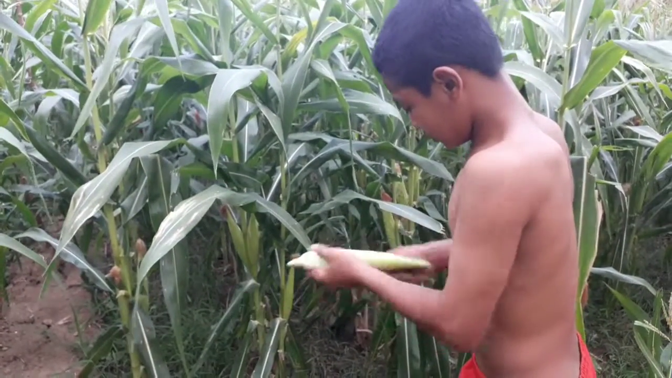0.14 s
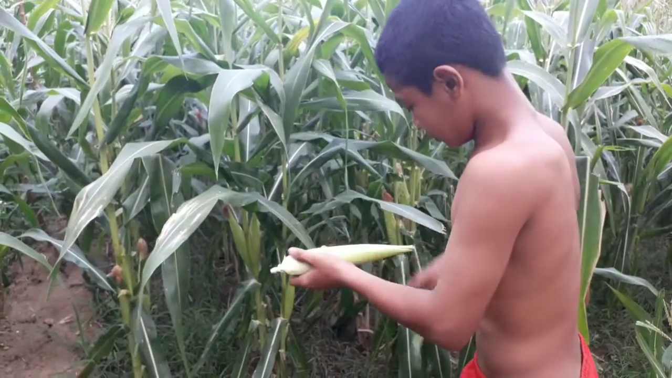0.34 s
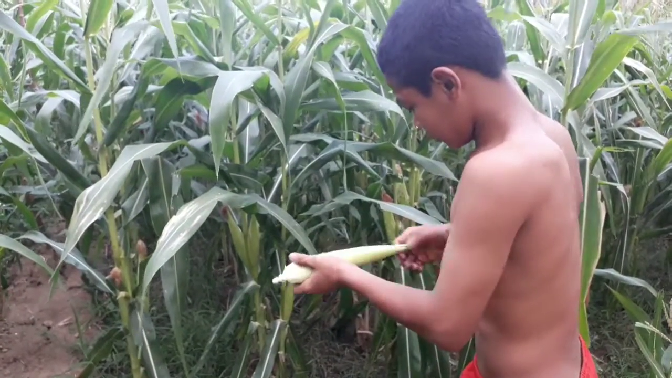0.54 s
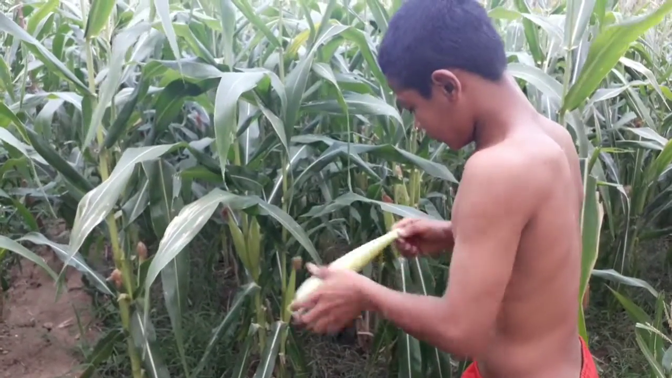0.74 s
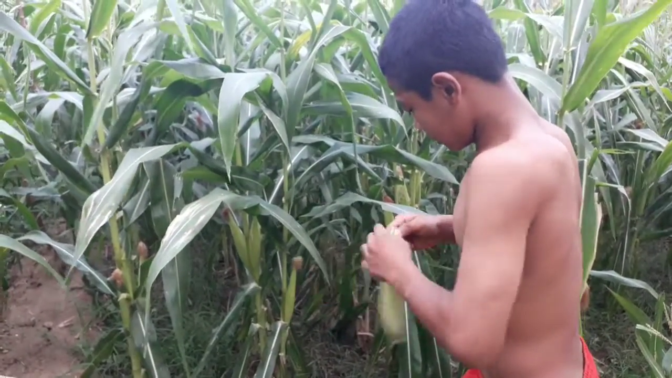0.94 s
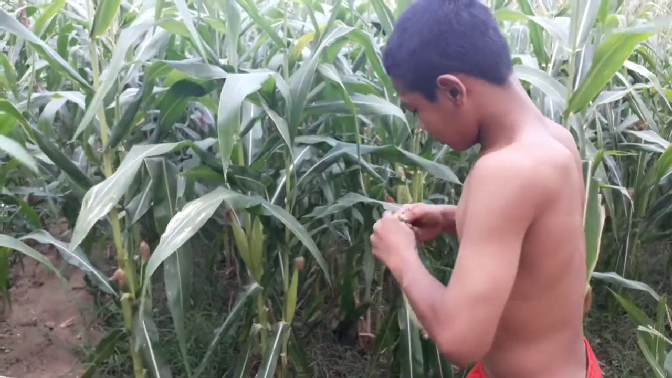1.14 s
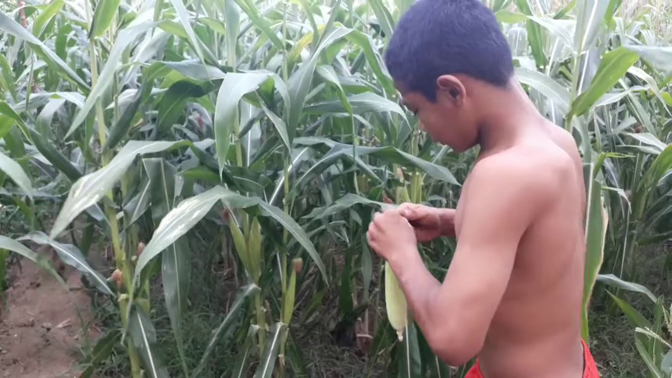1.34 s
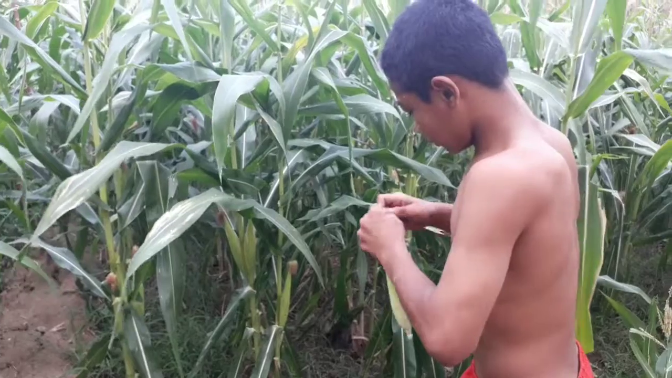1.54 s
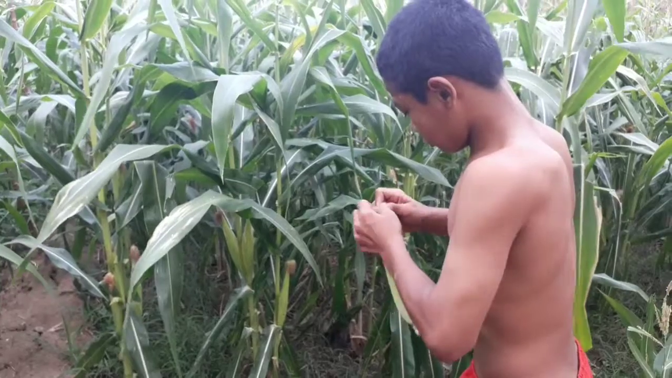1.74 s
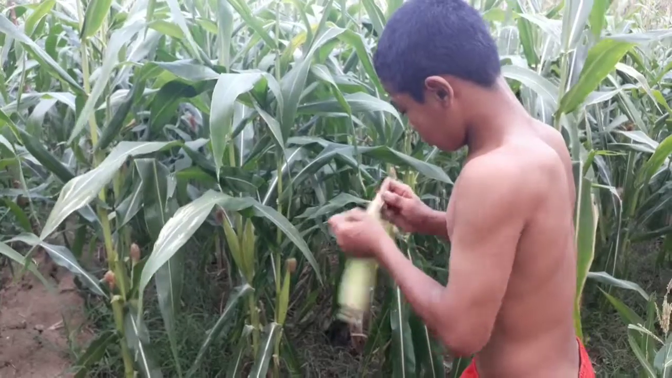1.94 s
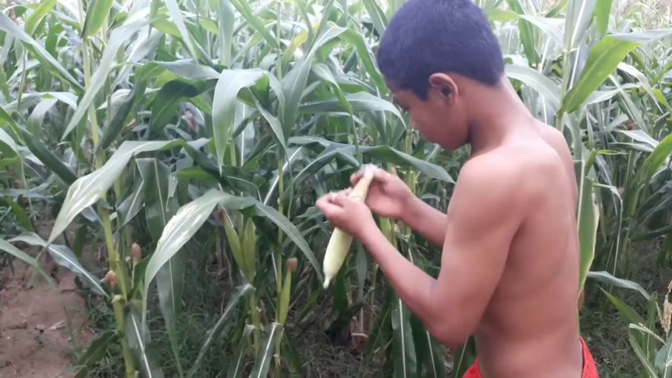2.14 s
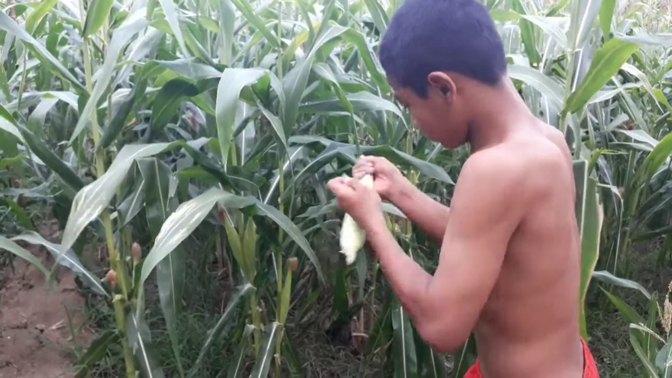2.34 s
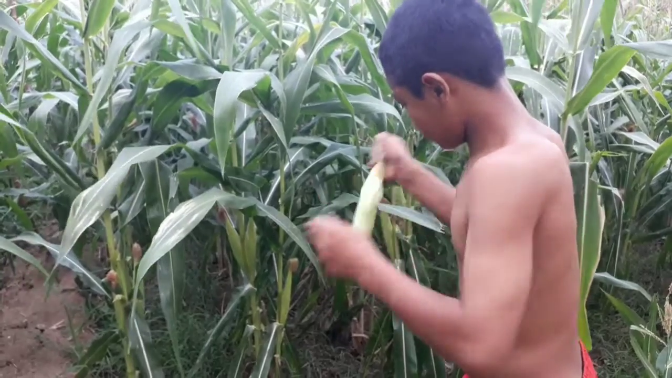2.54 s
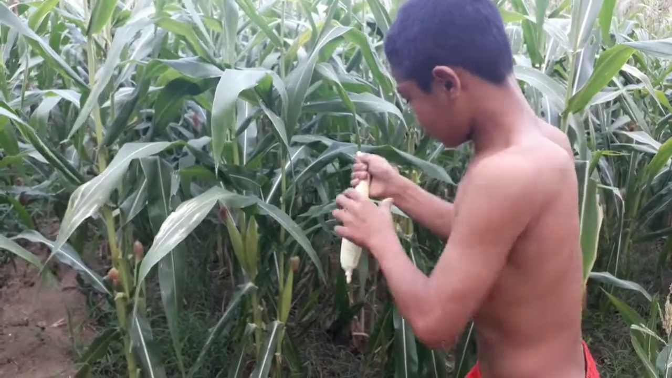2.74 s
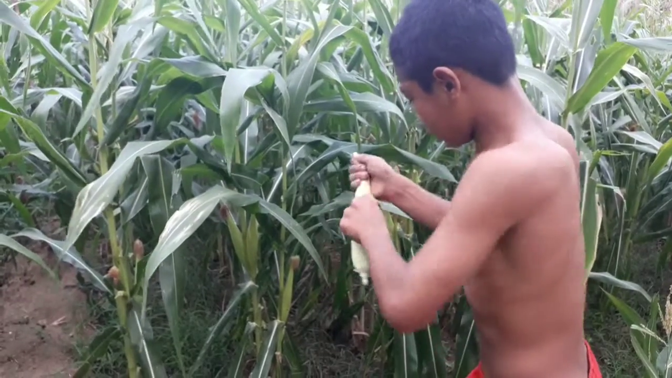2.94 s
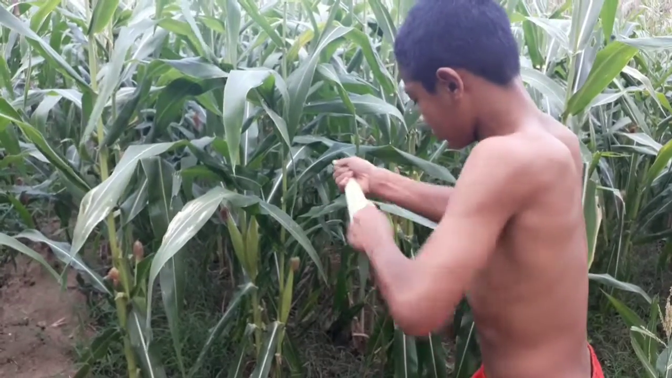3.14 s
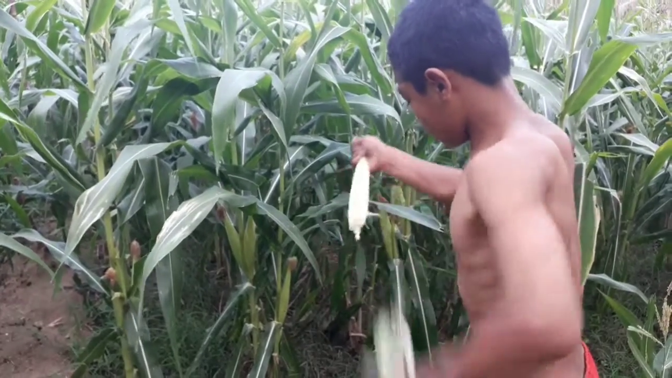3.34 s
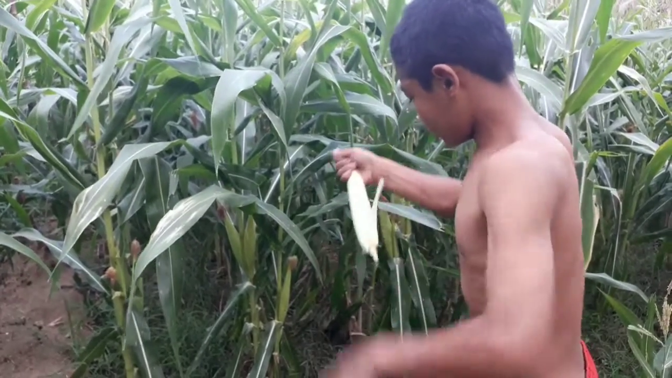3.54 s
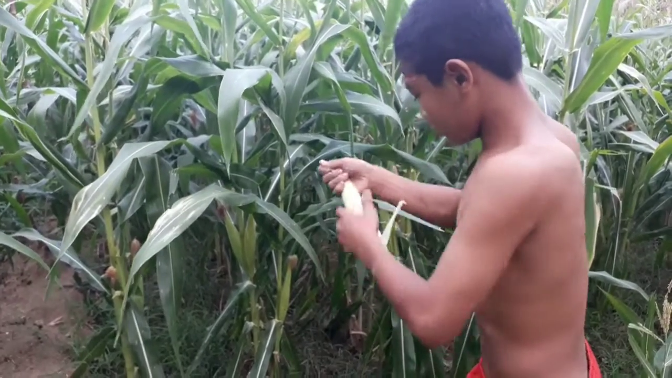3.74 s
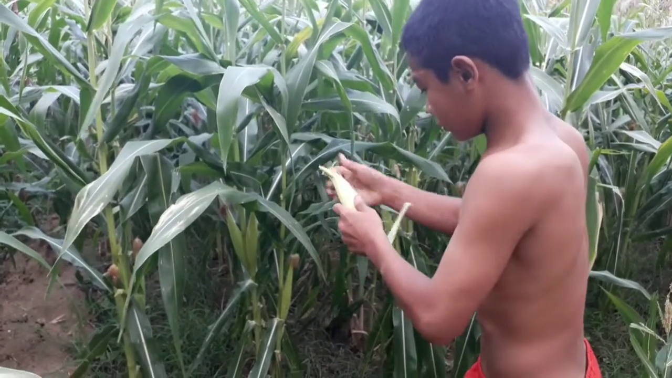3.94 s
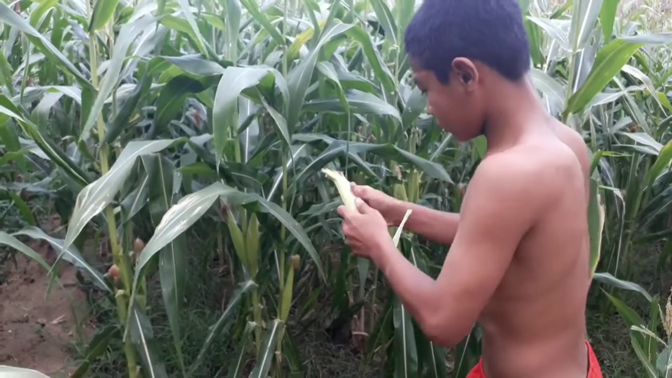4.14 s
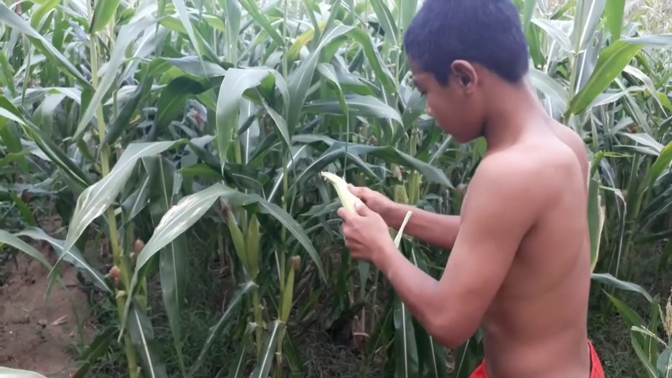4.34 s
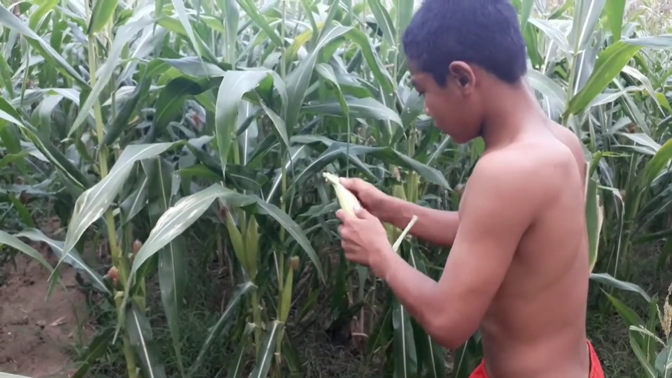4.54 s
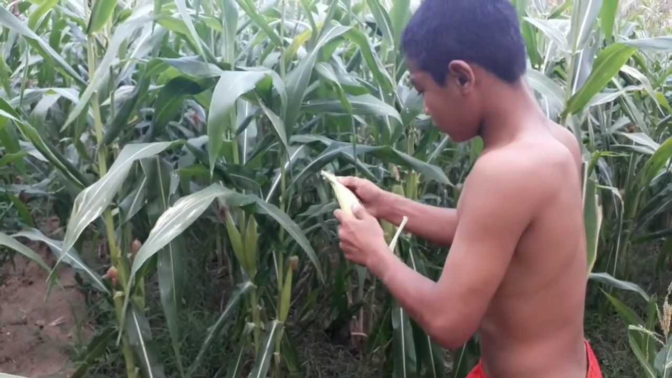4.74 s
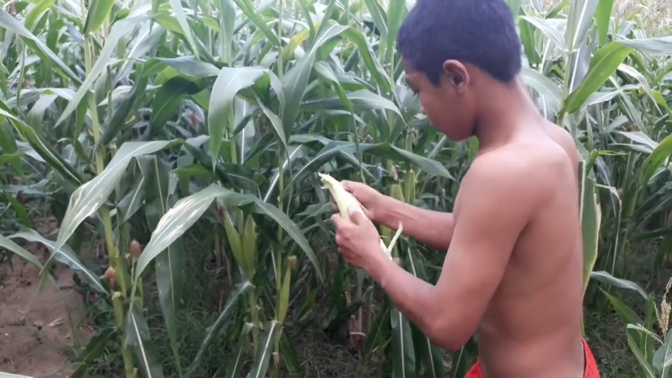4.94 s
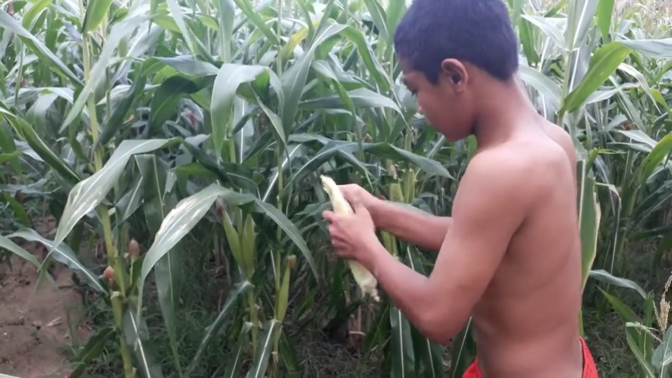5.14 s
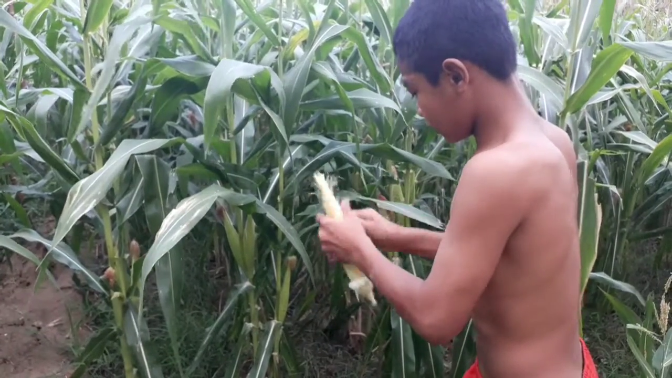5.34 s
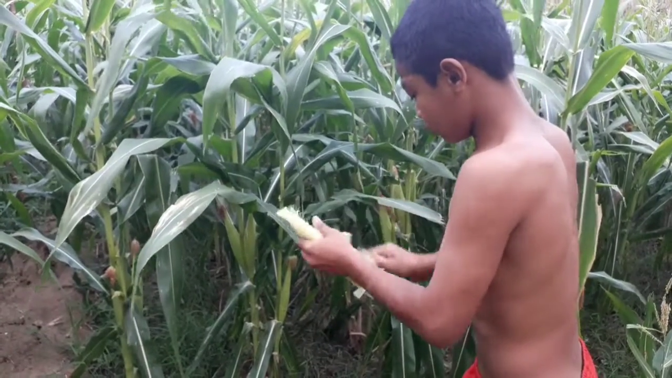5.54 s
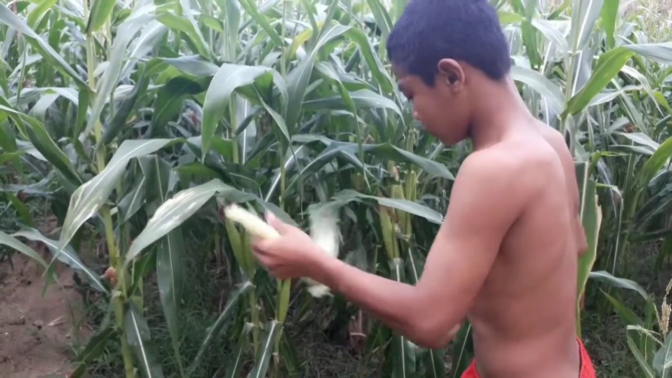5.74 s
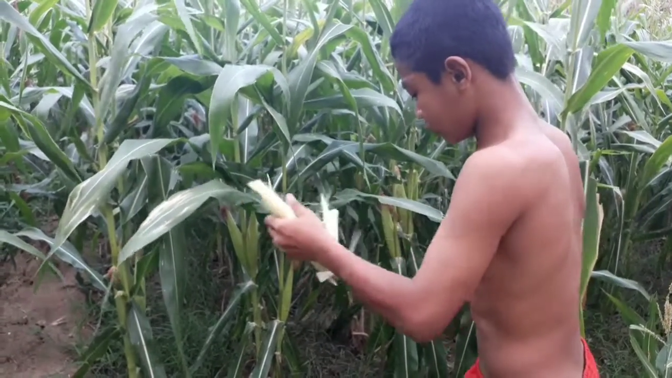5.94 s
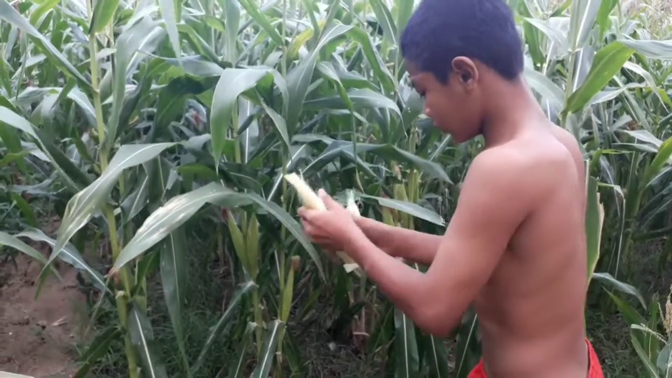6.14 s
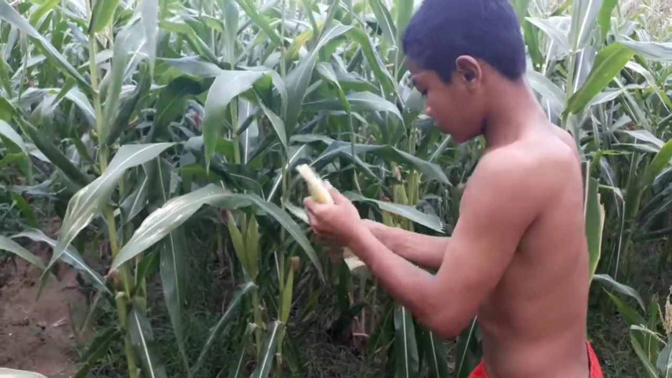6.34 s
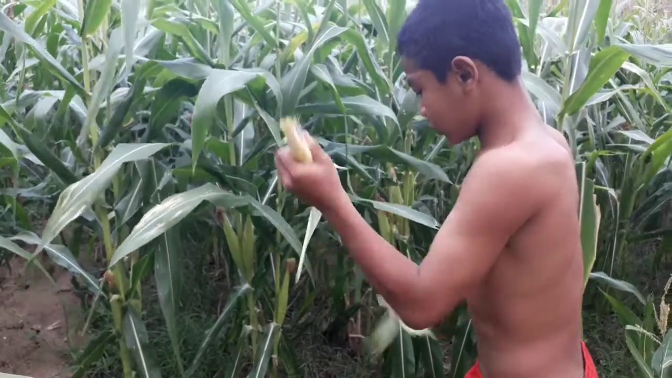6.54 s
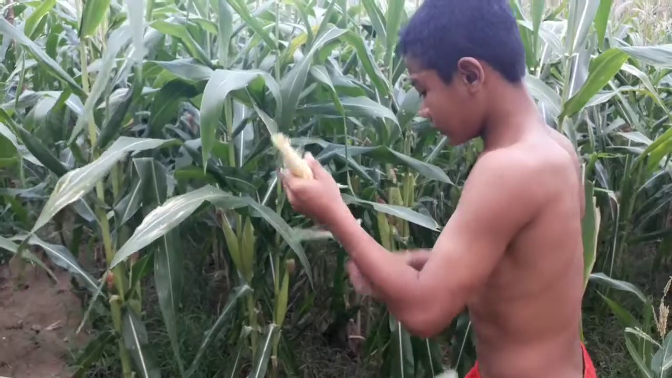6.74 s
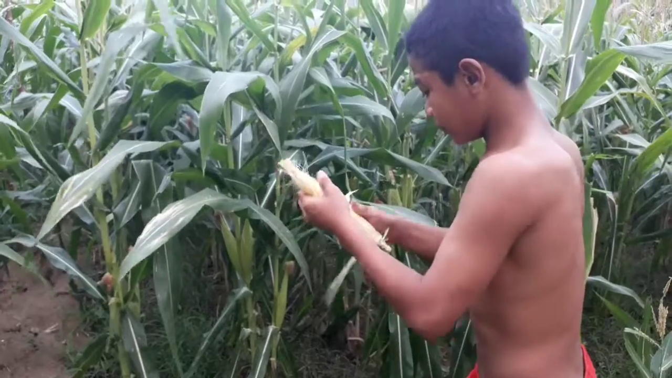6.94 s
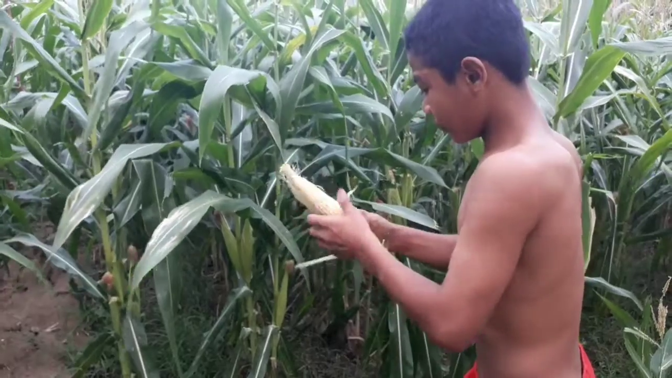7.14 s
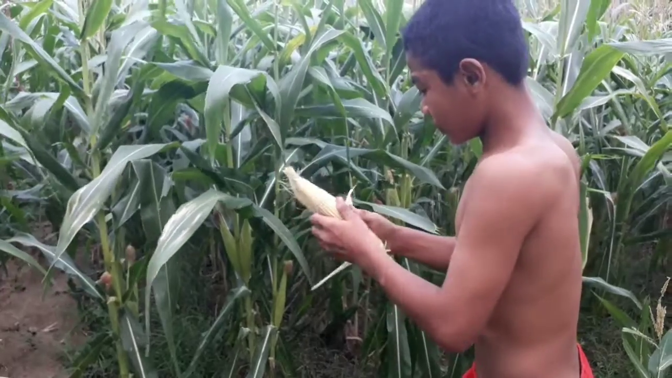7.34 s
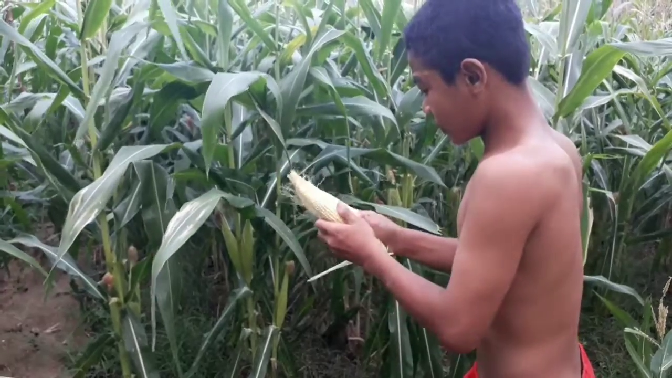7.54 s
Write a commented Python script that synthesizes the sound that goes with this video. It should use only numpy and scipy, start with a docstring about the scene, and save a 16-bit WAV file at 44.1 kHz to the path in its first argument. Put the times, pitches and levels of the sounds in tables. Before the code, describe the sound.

Close papery husk tearing and snapping outdoors, with lively birdsong throughout, soft leaf rustle, low air thuds and a distant engine revving up late.

```python
"""A fast upswept bird trill opens over field murmur and leaf hiss; at once dry corn husk starts to rip. Husk:
random fibre breaks swelling through leaf resonances, plus noise-burst snaps and dull crunches. Birds: swept
sines for trills, chips, held whistles, thin calls and pips; harmonics for a squeal; fluttering noise for rasps.
Far engine: firing pulses through exhaust modes, at last speeding up. Low air thuds bump the microphone."""
import sys
import numpy as np
from scipy import signal
from scipy.fft import rfft, irfft, next_fast_len
from scipy.io import wavfile
from scipy.ndimage import uniform_filter1d, minimum_filter1d, map_coordinates

SR = 44100
rng = np.random.default_rng(int(sys.argv[2]) if len(sys.argv) > 2 else 0)


def log_audio(samples):
    """Write samples as a 16-bit WAV file to the path given in sys.argv[1]."""
    # one column per channel
    frames = np.atleast_2d(samples).T
    # limit to full scale, then quantise
    limited = np.clip(frames, -1, 1)
    pcm = np.round(limited * 32767).astype(np.int16)
    wavfile.write(sys.argv[1], SR, pcm)


N = 334719
TOP_HZ = 15850  # band limit


def amp(db):
    """Decibels to gain."""
    return 10 ** (np.asarray(db) / 20)


def unit(x):
    """Scale to rms 1."""
    return x / np.sqrt(np.mean(x ** 2) + 1e-20)


def clock(length_s):
    """Sample times of a stretch [s]."""
    return np.arange(int(length_s * SR)) / SR


def along(points, hz):
    """Interpolate (Hz, value) points on a log frequency axis."""
    f, v = np.transpose(points)
    return np.interp(np.log(hz + 1), np.log(f + 1), v)


def curves(rows, t):
    """Each column after the first, read at t."""
    s, *cols = np.transpose(rows)
    return [np.interp(t, s, c) for c in cols]


def wobble(rate_hz, size):
    """Random curve: straight lines between normal draws, rate_hz knots a second."""
    knots = rng.standard_normal(size // 16 + 4)
    return map_coordinates(knots, [np.arange(size) * rate_hz / SR], order=1)


def beats(start_s, gap_s, slowing_s, count):
    """Note numbers and times of a series whose gaps widen ever faster."""
    k = np.arange(round(count))
    squares_before = np.cumsum(k * k) - k * k
    return zip(k, start_s + k * gap_s + slowing_s * squares_before)


def add(track, s, x):
    """Mix x into the track at time s."""
    i = round(s * SR)
    x = x[max(-i, 0):max(N - i, 0)]
    track[max(i, 0):][:len(x)] += x


def filtered(x, response):
    """x times a response of frequency."""
    m = next_fast_len(x.shape[-1] + 8192)
    spectrum = rfft(x, m) * response(np.fft.rfftfreq(m, 1 / SR))
    return irfft(spectrum, m)[..., :x.shape[-1]]


def coloured(x, spectrum, size=1024):
    """Causal minimum-phase filter of unit energy with the given spectrum."""
    target = amp(along(spectrum, np.fft.rfftfreq(size, 1 / SR)))
    cepstrum = irfft(np.log(target + 1e-5))
    cepstrum[1:size // 2] *= 2
    cepstrum[size // 2 + 1:] = 0
    kernel = irfft(np.exp(rfft(cepstrum)))
    return signal.fftconvolve(x, kernel / np.linalg.norm(kernel))[:len(x)]


def resonator(modes):
    """Response of a few (Hz, width Hz, dB) resonances, alternating in sign."""
    def response(f):
        total = 0
        for k, (centre, width, db) in enumerate(modes):
            damping = 1j * f * width
            total = total + (-1) ** k * amp(db) * damping / (centre * centre - f * f + damping)
        return total
    return response


def crackle(rate_hz, spread_db):
    """Random tiny fractures of very unequal size, rms 1."""
    sizes = amp(spread_db * np.minimum(rng.standard_normal(N), 2)) * rng.choice([-1, 1], N)
    return unit(sizes * (rng.random(N) < rate_hz / SR))


def note(shape, length_s, hz, overtone_db, waver):
    """A whistled note: a slightly unsteady sine with weak second and third harmonics."""
    first, last = shape[0][0], shape[-1][0]
    t = clock(length_s * (last - first))
    ratio, db = curves(shape, t / length_s + first)
    pitch = hz * ratio * (1 + waver * wobble(760, len(t)))
    phase = 2 * np.pi * np.cumsum(pitch) / SR
    overtones = sum(np.sin(k * phase) * (k * pitch < TOP_HZ) for k in (2, 3))
    voice = np.sin(phase) + amp(overtone_db) * overtones
    return amp(db + 0.088 * wobble(87.2, len(t))) * voice * signal.windows.tukey(len(t), .02)


def limited(x, top_db):
    """Fast limiter: the gain dips around every peak above the ceiling."""
    needed = np.minimum(1, amp(top_db) / (np.abs(x) + 1e-9))
    return x * uniform_filter1d(minimum_filter1d(needed, size=61), size=61)


def saturated(x, top_db):
    """Round off the peaks near the ceiling."""
    return x / (1 + (x / amp(top_db)) ** 6) ** (1 / 6)


# plant scatter: (frequency [Hz], t60 [s])
SCATTER_T60 = [(300, 0.025), (4000, 0.12), (12000, 0.14)]


def scatter(x):
    """The short diffuse answer of the surrounding plants: noise decaying at its own rate per band."""
    hz, t, z = signal.stft(rng.standard_normal(SR // 4), SR, nperseg=256)
    decay = amp(-60 * t / along(SCATTER_T60, hz)[:, None])
    tail = signal.istft(z * decay, SR, nperseg=256)[1]
    return signal.fftconvolve(x, tail / np.linalg.norm(tail))[:N]


# background levels: (time [s], murmur [dB], leaf hiss [dB])
AIR_LEVELS = [(0, -53, -49), (2.2, -52, -49.3), (2.5, -52, -52.5), (4.8, -54.5, -52.5), (5.7, -49.5, -50),
              (6.8, -52.5, -51.5), (7.59, -49.5, -49)]
# murmur spectrum: (frequency [Hz], density [dB per Hz])
MURMUR_SPECTRUM = [(25, -21), (55, 1.5), (95, 3.5), (140, 2), (340, -8.5), (550, -11), (800, -10.5),
                   (1100, -14), (1500, -12), (3000, -10.5), (3900, -32), (6600, -120)]
# leaf hiss spectrum: (frequency [Hz], density [dB per Hz])
HISS_SPECTRUM = [(1180, -15), (2000, -6.5), (2830, -9.5), (3550, -2), (4610, 0.5), (5730, -1), (7380, -10),
                 (8190, -8), (12900, -11), (16000, -17)]


def field():
    """Coloured noise for murmur and hiss, sparse leaf ticks, and a faint low hum from halfway."""
    t = np.arange(N) / SR
    murmur_db, hiss_db = curves(AIR_LEVELS, t)
    murmur = amp(murmur_db + 1.53 * wobble(8, N)) * coloured(rng.standard_normal(N), MURMUR_SPECTRUM)
    ticks = amp(2 * wobble(6.6, N)) * crackle(rate_hz=220, spread_db=3.5)
    leaves = rng.standard_normal(N) + 0.25 * ticks
    hiss = amp(hiss_db + 0.44 * wobble(5, N)) * coloured(leaves, HISS_SPECTRUM)
    hum = amp(-56) * np.sin(2 * np.pi * 50 * t) * np.clip((t - 3.72) / .05, 0, 1)
    return murmur + hiss + hum


# air thuds: (time [s], gaussian width [s], level [dB], centre [Hz])
AIR_BUMPS = [(1.07, 0.044, -49, 55), (1.22, 0.12, -46.5, 110), (1.868, 0.096, -45.5, 90.1),
             (1.981, 0.02, -36.5, 123), (2.046, 0.0077, -29, 134), (2.073, 0.0057, -25.5, 127),
             (2.18, 0.064, -44.5, 95.7), (2.335, 0.018, -31, 119.8), (2.391, 0.0079, -34, 142),
             (2.521, 0.022, -46, 84), (5.729, 0.02, -44.5, 141.3), (5.824, 0.0082, -33.5, 113.5),
             (5.878, 0.0077, -34.5, 94.6), (5.936, 0.019, -33, 30), (6.222, 0.013, -32.5, 118)]


def bumps():
    """Air bumping the microphone: gaussian bursts of a low sine with unsteady pitch and level."""
    out = np.zeros(N)
    for s, width_s, db, hz in AIR_BUMPS:
        t = clock(6 * width_s) - 3 * width_s
        pitch = hz * np.exp(0.3037 * wobble(199.8, len(t)))
        phase = 2 * np.pi * np.cumsum(pitch) / SR
        thud = np.sin(phase) + amp(-17) * np.sin(2 * phase)
        level = amp(db + 3.4 * wobble(52.4, len(t))) * np.exp(-.5 * (t / width_s) ** 2)
        add(out, s + t[0], level * thud)
    return out


# engine course: (time [s], firing rate [Hz], level [dB])
ENGINE_COURSE = [(2.8, 13.5, -74), (3.3, 18, -52.5), (3.8, 20.7, -50.5), (4.1, 14.6, -52.5),
                 (4.7, 15.4, -58), (5.3, 15.4, -53.5), (6.25, 18.5, -49), (6.6, 25.5, -46.5),
                 (7.59, 30.8, -41)]
# idle exhaust modes: (centre [Hz], width [Hz], gain [dB])
EXHAUST_MODES = [(133, 11.1, -0.5), (263.1, 14.6, -3.5), (421, 81, -21.5)]


def engine(stretch=1.082):
    """Uneven firings and steady flow ring the exhaust; fast running fades to stretched resonances."""
    rate_hz, db = curves(ENGINE_COURSE, np.arange(N) / SR)
    turns = np.cumsum(rate_hz * (1 + .05 * wobble(25, N))) / SR
    pulses = np.diff(np.floor(turns), prepend=0)
    firings = unit(pulses * amp(1.6 * wobble(30, N)) / np.sqrt(rate_hz))
    puffs = firings + .6 * rng.standard_normal(N)
    pipe = resonator(EXHAUST_MODES)
    idle = unit(filtered(puffs, pipe))
    revved = unit(filtered(puffs, lambda hz: pipe(hz / stretch)))
    load = np.clip((rate_hz - 19) / 9, 0, 1)
    return amp(db) * (np.sqrt(1 - load) * idle + np.sqrt(load) * revved)


# soft notes: (time [s], length [s], pitch [Hz], level [dB])
PIP_NOTES = [(1.012, 0.0356, 5800, -45.5), (5.909, 0.037, 3059, -37), (5.96, 0.04, 3030, -52),
             (7.215, 0.076, 1073, -52.5)]
# nearly level note: (share of length [1], pitch ratio [1], level [dB])
PIP_SHAPE = [(0, .99, -18), (.25, 1, -2), (.7, 1.005, 0), (1, 1, -16)]


def pips():
    """Single soft notes: nearly level sines, some at the whistle's pitch."""
    song = np.zeros(N)
    for s, length_s, hz, db in PIP_NOTES:
        add(song, s, amp(db) * note(PIP_SHAPE, length_s, hz, overtone_db=-14, waver=0.029))
    return song


# thin calls: (time [s], length [s], reference pitch [Hz], level [dB], leftward share [0-1])
SLUR_CALLS = [(0.229, 0.08, 7100, -45, 0), (0.314, 0.046, 7454, -37, 0), (0.385, 0.054, 7470, -40, 0.1),
              (0.447, 0.043, 5300, -48, 0.1), (7.099, 0.055, 7626, -35.5, 0.99),
              (7.322, 0.054, 7800, -43, 0.03), (7.475, 0.039, 7570, -37, 0.39)]
# rise, then fall: (share of length [1], pitch ratio [1], level [dB])
SLUR_SHAPE = [(0, 0.85, -18), (.14, 0.949, -1), (.35, 0.973, -6.5), (.65, .86, -2), (1, 0.64, -11)]


def slurs():
    """Thin falling sines, some leaning left: mid and side signals."""
    mid, side = np.zeros(N), np.zeros(N)
    for s, length_s, hz, db, leftward in SLUR_CALLS:
        call = amp(db) * note(SLUR_SHAPE, length_s, hz, overtone_db=-46, waver=0.0265)
        add(mid, s, call)
        add(side, s, leftward * call)
    return mid, side + scatter(amp(0.5) * mid)


# whistled songs: (whistle start [s], length [s], pitch [Hz], level [dB], wait for closing arch [s])
WHISTLE_SONGS = [(4.052, 0.24, 3041, -28.5, 0.34), (4.868, 0.25, 3066, -33.5, 0.309),
                 (5.648, 0.22, 2995, -36.5, 0.39), (6.546, 0.266, 3010, -31.5, 0.3734),
                 (7.452, 0.2, 3010, -37, 0.35)]
# drop to a held pitch: (share of length [1], pitch ratio [1], level [dB])
WHISTLE_SHAPE = [(0, 1.45, -31), (.015, 1.38, 6), (.05, 1.18, -5), (.1, 1.06, -9), (.18, 1.005, -7),
                 (.3, 0.9804, -8), (.6, 1, -3.5), (.85, 1.012, -1.5), (.98, 1.012, 2.5), (1, 1.01, -15)]
# rise and fall: (share of length [1], pitch ratio [1], level [dB])
ARCH_SHAPE = [(0, .66, -26), (.25, .86, -20), (.36, 0.9274, -8.5), (.5, 0.99, -4), (.66, .96, -4.5),
              (.78, .85, -20.5), (1, 0.667, -25.5)]
LEAD_ADVANCE_S, LEAD_S, LEAD_HZ, LEAD_REL_DB = 0.024, 0.021, 3183, 3.5  # level relative to whistle
CLOSING_S, CLOSING_HZ, CLOSING_DB = 0.05, 3162, -23.5
PICKUP_ADVANCE_S, PICKUP_S, PICKUP_HZ, PICKUP_DB = 0.033, 0.037, 2280, -47.5


def whistler():
    """Each song: quick arch, drop onto a held pitch that swells, soft pip, closing arch."""
    song = np.zeros(N)
    for s, length_s, hz, db, wait_s in WHISTLE_SONGS:
        closing_s = s + wait_s
        lead = note(ARCH_SHAPE, LEAD_S, LEAD_HZ, overtone_db=-23.5, waver=0.0097)
        held = note(WHISTLE_SHAPE, length_s, hz, overtone_db=-40, waver=0.004063)
        pickup = note(PIP_SHAPE, PICKUP_S, PICKUP_HZ, overtone_db=-22, waver=0.0145)
        closing = note(ARCH_SHAPE, CLOSING_S, CLOSING_HZ, overtone_db=-29.5, waver=0.012)
        add(song, s - LEAD_ADVANCE_S, amp(db + LEAD_REL_DB) * lead)
        add(song, s, amp(db) * held)
        add(song, closing_s - PICKUP_ADVANCE_S, amp(PICKUP_DB) * pickup)
        add(song, closing_s, amp(CLOSING_DB) * closing)
    return song


# chip runs: (start [s], notes [1], first gap [s], slowing [s], level [dB], urgency [0-1])
CHIP_SERIES = [(3.7455, 5, 0.0611, 0.0001, -32.5, 0.18), (4.121, 3, 0.0635, 0.0001, -31.5, 0.08),
               (4.3018, 14, 0.05624, 0.00013, -31.5, 0.43), (5.3372, 5, 0.049, 0.00072, -33.5, 0.88),
               (6.013, 4, 0.052, 0.00032, -32.5, 0.94), (6.208, 3, 0.057, 0.0041, -33, 0.33),
               (6.7752, 10, 0.049, 0.00026, -32.5, 0.86)]
# hooked note: (share of length [1], pitch ratio [1], level [dB])
CHIP_SHAPE = [(-.06, 0.94, -44.5), (0, .9, -27.5), (.18, 0.97, -7.5), (.36, 1, -1), (.54, .96, -0.5),
              (.72, .86, -16.5), (1, 0.74, -18.5)]
CALM_CHIP_HZ, CHIP_S = 3808, 0.028
URGENT_EXTRA_HZ, URGENT_EXTRA_DB, CALMING_NOTES = 270, 5, 2.25  # extras at urgency 1


def chips():
    """Runs of short hooked notes that slow, sink and soften as the bird calms."""
    song = np.zeros(N)
    for start, notes, gap, slowing, db, urgency in CHIP_SERIES:
        for k, s in beats(start, gap, slowing, count=notes):
            urge = urgency * np.exp(-k / CALMING_NOTES)
            hz = CALM_CHIP_HZ + URGENT_EXTRA_HZ * urge
            chip = note(CHIP_SHAPE, CHIP_S, hz, overtone_db=-29, waver=0.018)
            add(song, s + CHIP_SHAPE[0][0] * CHIP_S, amp(db + URGENT_EXTRA_DB * urge) * chip)
    return song


# scolding notes: (time [s], level [dB])
RASP_NOTES = [(2.636, -43), (2.743, -43), (2.873, -36.5), (3.71, -35), (3.883, -32), (4.264, -35.5),
              (5.341, -35.5), (5.499, -32.5), (5.796, -35.5), (6.094, -40.5), (6.479, -35), (7.437, -42),
              (7.558, -39.5)]
# throat spectrum: (frequency [Hz], density [dB per Hz])
RASP_SPECTRUM = [(530, -23), (900, -21), (1120, -11.5), (1740, -6.5), (2040, -12), (2780, -8), (2940, -6.5),
                 (3200, -7.5), (3620, -3), (4160, -10), (5260, -4.5), (5950, -8), (6600, -10.5),
                 (7450, -19), (8500, -19.5), (11000, -24), (18700, -120)]
# throat resonances: (centre [Hz], width [Hz], gain [dB])
THROAT_MODES = [(1550, 690, -9.5), (3690, 630, 5), (5260, 930, 2.5)]
RASP_S = 0.056


def rasps(buzz_hz=124, ring_db=2):
    """Harsh scolding notes: noise chopped by a fast flutter, ringing in the throat."""
    song = np.zeros(N)
    t = clock(RASP_S + .05)
    swell_s = [0, .012, 0.54 * RASP_S, RASP_S, RASP_S + 0.045]
    swell_db = np.interp(t, swell_s, [-13.5, -1.5, 3.0, -6.0, -45])
    for s, db in RASP_NOTES:
        turns = np.cumsum(buzz_hz * (1 + 0.14 * wobble(49.0, len(t)))) / SR
        flutter = unit(amp(5.5 * np.cos(2 * np.pi * turns) + 1.5 * wobble(120, len(t))))
        add(song, s - .003, amp(db + swell_db) * flutter * rng.standard_normal(len(t)))
    ringing = filtered(song, resonator(THROAT_MODES))
    return coloured(amp(-6) * song + amp(ring_db) * ringing, RASP_SPECTRUM)


# squeal pitch: (time [s], fundamental [Hz])
SQUEAL_PITCH = [(1.088, 1291), (1.101, 1357), (1.115, 1747), (1.14, 1677), (1.16, 1722), (1.198, 2024),
                (1.284, 1775)]
# squeal throat: (frequency [Hz], gain [dB])
SQUEAL_SPECTRUM = [(1300, -35.5), (1900, -17.5), (2800, -11), (3400, -12), (3700, -2.5), (4000, 4.5),
                   (4600, -3), (5200, 7.5), (5550, -13), (6000, -6), (6800, -16), (9500, -42), (12000, -25),
                   (15300, -23)]
SQUEAL_DB, SQUEAL_ATTACK_S = -27, 0.023


def squeal():
    """A reedy cry that breaks off: harmonics two and three take turns in the throat resonances."""
    song, start_s = np.zeros(N), SQUEAL_PITCH[0][0]
    t = clock(SQUEAL_PITCH[-1][0] - start_s)
    hz, = curves(SQUEAL_PITCH, t + start_s)
    db = SQUEAL_DB + np.interp(t, [0, SQUEAL_ATTACK_S, t[-1] - .003, t[-1]], [-24, 1, 0, -35])
    phase = 2 * np.pi * np.cumsum(hz * (1 + 0.011 * wobble(1200, len(t)))) / SR
    k = np.arange(1, 10)[:, None]
    weights = amp(along(SQUEAL_SPECTRUM, k * hz))
    voice = (weights * np.sin(k * phase)).sum(0) / np.linalg.norm(weights, axis=0)
    hoarse = coloured(rng.standard_normal(len(t)), SQUEAL_SPECTRUM)
    add(song, start_s, amp(db) * (voice + amp(-16.5) * hoarse))
    return song


# trill phrases: (top of first note [s], notes [1], first gap [s], slowing [s], level [dB],
#                 crescendo [dB], lower voice [dB])
TRILL_PHRASES = [(-0.1705, 6, 0.057, 0.00057, -28, 3, -35.5), (0.686, 8, 0.046, 0.00051, -29, 3.5, -40),
                 (1.458, 6, 0.046, 0.00128, -27.5, 3, -39.5), (1.909, 7, 0.04307, 0.00219, -28.5, 6, -34),
                 (7.1125, 6, 0.041, 0.00234, -31.5, 8, -41)]
# opening sweep: (share of length [1], pitch ratio [1], level [dB])
OPENING_SHAPE = [(-.03, .68, -40), (.03, .7, -10), (.2, .77, 0), (.45, .86, 0), (.8, .92, -2), (1, .96, -3),
                 (1.2, .85, -20)]
# later sweeps: (share of length [1], pitch ratio [1], level [dB])
UPSWEEP_SHAPE = [(-.1, 0.84, -43), (0, 0.64, -24), (.2, 0.7527, -4), (.55, 0.815, -2.5), (.8, 0.902, -4),
                 (1, 0.97, -11.5), (1.25, .93, -23)]
# lower voice: (share of length [1], pitch ratio [1], level [dB])
UNDERTONE_SHAPE = [(0, .78, -22), (.35, .88, -6), (.62, 1.01, 0), (.75, 1, -2), (1, .86, -16)]
SWEEP_S, OPENING_EXTRA_S, EXTRA_KEPT_PER_NOTE = 0.018, 0.029, 0.33
SWEEP_REF_HZ, LOWER_REF_HZ, OPENING_LOWER_REF_HZ = 9290, 4930, 4600
LOUDEST_NOTE = 4  # counted from 0


def trill():
    """A slow upsweep, then shorter, swelling, spreading notes; the syrinx's other side sings lower."""
    song = np.zeros(N)
    for start, notes, gap, slowing, db, crescendo_db, lower_db in TRILL_PHRASES:
        for k, top_s in beats(start, gap, slowing, count=notes):
            length_s = SWEEP_S + OPENING_EXTRA_S * EXTRA_KEPT_PER_NOTE ** k
            s = top_s - length_s
            soft_db = crescendo_db * (1 - k / LOUDEST_NOTE) ** 2
            shape = UPSWEEP_SHAPE if k else OPENING_SHAPE
            sweep = note(shape, length_s, SWEEP_REF_HZ, overtone_db=-39.0, waver=0.01)
            add(song, s + shape[0][0] * length_s, amp(db - soft_db) * sweep)
            if k:
                lower_hz = LOWER_REF_HZ * rng.normal(1, .015)
                lower = note(UNDERTONE_SHAPE, length_s + .008, lower_hz, overtone_db=-30, waver=.02)
                add(song, s + 0.37 * length_s, amp(lower_db - 2.0 * soft_db) * lower)
            else:
                lower = note(shape, length_s, OPENING_LOWER_REF_HZ, overtone_db=-29.5, waver=0.0032)
                add(song, s + .15 * length_s, amp(lower_db - soft_db - 4) * lower)
    add(song, .0115, amp(-14.5) * song)  # one near reflection
    return song


# fibres and ribs giving way: (time [s], body level [dB], treble level [dB])
RIB_SNAPS = [(0.0652, -29, -39), (0.0794, -27.5, -36), (1.814, -30, -35), (1.948, -34, -31),
             (2.208, -30, -40), (2.3156, -25, -47), (3.1356, -32, -44), (3.168, -20.5, -44),
             (3.283, -22, -37), (3.312, -19.5, -21), (3.315, -16.5, -31), (5.619, -17, -61),
             (5.6243, -28, -22), (5.63, -23, -26), (5.711, -26, -47), (6.404, -19.5, -43),
             (6.429, -18.5, -38), (6.4372, -20.5, -34), (7.009, -40, -45)]
# dull crunches: (time [s], level [dB])
DULL_CRUNCHES = [(0.064, -29.5), (0.078, -31.5), (3.272, -34.5), (3.295, -36), (5.66, -37.5), (5.71, -40)]
# crunch spectrum: (frequency [Hz], density [dB per Hz])
CRUNCH_SPECTRUM = [(180, -55), (300, -6), (1190, -3), (1590, 0), (2460, 0.5), (3150, -2.5), (3750, 0),
                   (4000, -14.5), (5200, -28.5), (8800, -120)]
# fibre spectrum, also used by husk(): (frequency [Hz], density [dB per Hz])
FIBRE_SPECTRUM = [(4120, -27), (7000, -6.5), (10100, -9), (14400, -4.5), (15100, -7.5), (16000, -11.5)]
# husk leaf ring, also used by husk(): (frequency [Hz], density [dB per Hz])
LEAF_SPECTRUM = [(180, -50), (300, -23.5), (428, -34), (629, -18.5), (1260, -20), (1610, -14), (2140, -20),
                 (2360, -14), (2610, -14), (2920, -7.5), (4550, 3.5), (8150, -21.5), (9000, -18.5),
                 (11700, -30), (19800, -120)]


def snaps():
    """A rib cracks with a short spray of splinters; duller crunches fill out the rips."""
    body, edge, crunch = np.zeros(N), np.zeros(N), np.zeros(N)
    t = clock(.06)
    crack_decay = amp(-60 * t / 0.0019) + 0.53 * amp(-60 * t / 0.06)
    for s, db, treble_db in RIB_SNAPS:
        crack = rng.standard_normal(len(t)) * crack_decay
        add(body, s, amp(db) * crack)
        add(edge, s, amp(treble_db) * crack)
    for s, db in DULL_CRUNCHES:
        add(crunch, s, amp(db - 60 * t / 0.064) * rng.standard_normal(len(t)))
    cracks = coloured(body, LEAF_SPECTRUM) + coloured(edge, FIBRE_SPECTRUM)
    return cracks + coloured(crunch, CRUNCH_SPECTRUM)


# husk rips: (start [s], swell [s], ease [s], leaf body [dB], snapping fibres [dB])
HUSK_RIPS = [(0.063, 0.004, 0.016, -42, -39), (1.937, 0.01, 0.035, -43.5, -47),
             (2.261, 0.038, 0.104, -37, -38.5), (3.088, 0.085, 0.1, -28, -34.5),
             (3.262, 0.055, 0.006, -21.5, -28.5), (3.471, 0.0054, 0.0065, -43.5, -43),
             (5.437, 0.023, 0.01, -37, -41), (5.595, 0.008, 0.0088, -32, -42),
             (5.619, 0.0077, 0.003, -21.5, -37), (5.652, 0.066, 0.022, -29, -40),
             (6.31, 0.02, 0.041, -42.5, -49), (6.386, 0.018, 0.012, -39, -44),
             (6.427, 0.0095, 0.022, -33, -35.5)]
RIP_ATTACK_S, RIP_RELEASE_S = 0.018, 0.04
RIP_SWELL_DB, RIP_EASE_DB = 8, 4.5  # growth up to the hardest pull, easing after it


def husk():
    """Each rip swells to its hardest pull and lets go: breaking fibres click and shake the stiff leaf."""
    t = np.arange(N) / SR
    fibre_gain, leaf_gain = np.zeros(N), np.zeros(N)
    pull_db = [-30, -RIP_SWELL_DB, 0, -RIP_EASE_DB, -45]
    for start, swell, ease, leaf_db, fibre_db in HUSK_RIPS:
        end = swell + ease
        corners_s = start + np.array([-RIP_ATTACK_S, 0, swell, end, end + RIP_RELEASE_S])
        pull = amp(np.interp(t, corners_s, pull_db, left=-np.inf, right=-np.inf))
        fibre_gain = np.maximum(fibre_gain, amp(fibre_db) * pull)
        leaf_gain = np.maximum(leaf_gain, amp(leaf_db) * pull)
    # the tear catches and runs on in small bunches of fibres
    bunching = amp(2.3 * wobble(280, N))
    breaks = unit(bunching * (crackle(rate_hz=1500, spread_db=4) + .45 * rng.standard_normal(N)))
    return coloured(breaks * fibre_gain, FIBRE_SPECTRUM) + coloured(breaks * leaf_gain, LEAF_SPECTRUM)


# stereo spread: (frequency [Hz], side gain [dB])
SIDE_WIDTH = [(60, -17), (200, -17), (1200, -6.5), (3000, -13), (8000, -14), (13000, -6.5)]


def scene():
    """The husk is mixed in mono; the birdsong, held under one ceiling, has a slight stereo spread."""
    peel = husk() + snaps()
    high, chain, harsh = trill(), chips(), rasps()
    whistles = whistler() + pips()
    calls, calls_side = slurs()
    pure = whistles + calls
    rumble = engine() + bumps()
    echoed = amp(-6) * high + amp(-8) * chain + amp(-7.5) * pure + amp(-6.0) * harsh
    song = high + chain + pure + harsh + squeal() + scatter(echoed)
    birds = saturated(limited(amp(1.5) * song, top_db=-25.5), top_db=-27.0)
    mid = birds + field() + rumble + peel + scatter(amp(-9) * peel)
    spread = scatter(high + chain + whistles + amp(-12.5) * rumble)
    side = filtered(spread, lambda hz: amp(along(SIDE_WIDTH, hz))) + calls_side
    return np.array([mid + side, mid - side])


def record(dry):
    """The recorder keeps nothing above its band limit."""
    return filtered(dry, lambda hz: hz < TOP_HZ)


dry = scene()
out = record(dry)
log_audio(out)
```